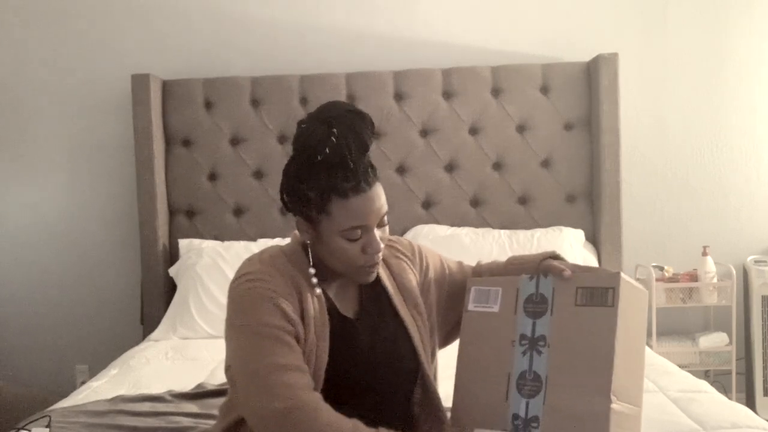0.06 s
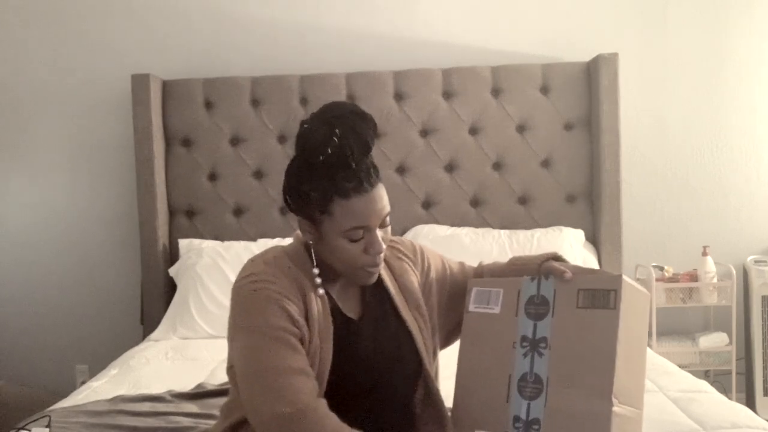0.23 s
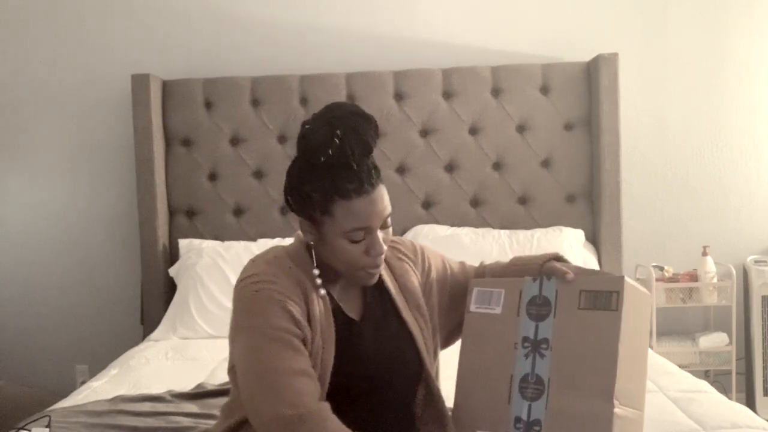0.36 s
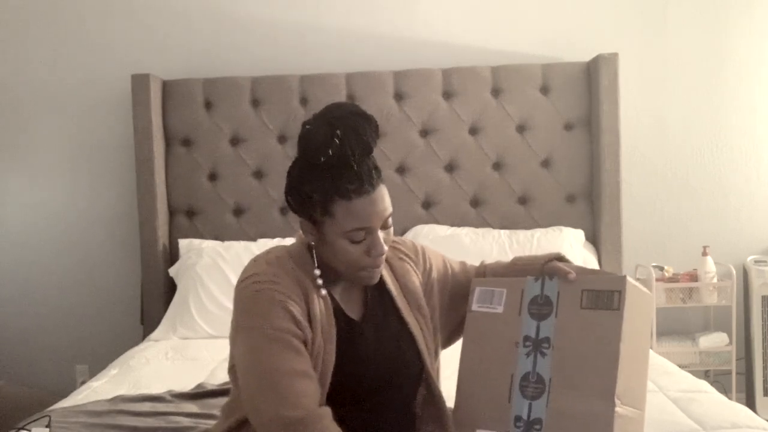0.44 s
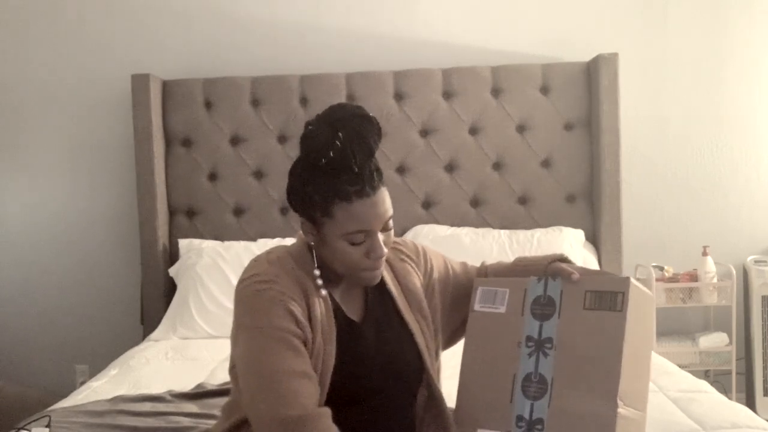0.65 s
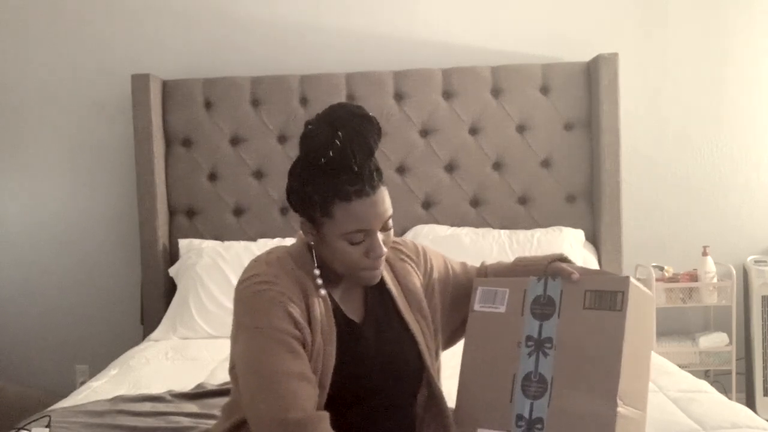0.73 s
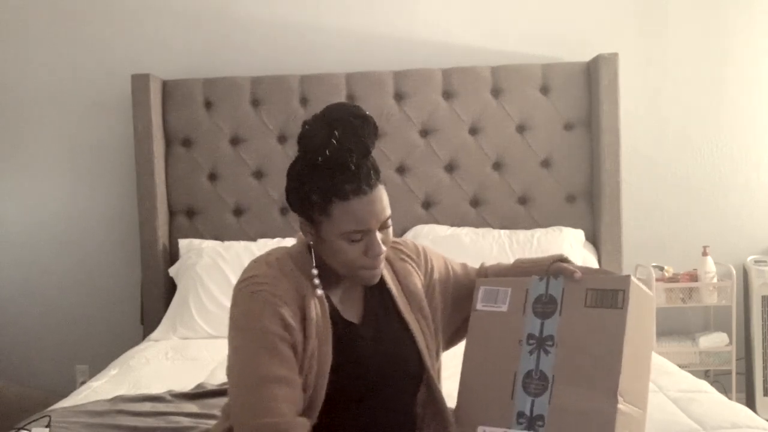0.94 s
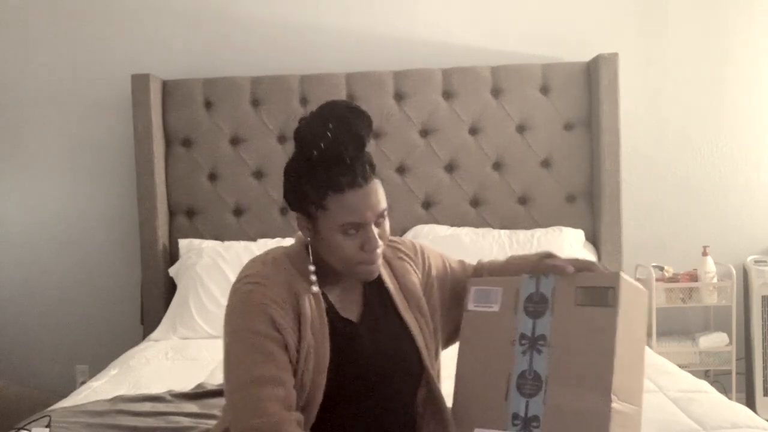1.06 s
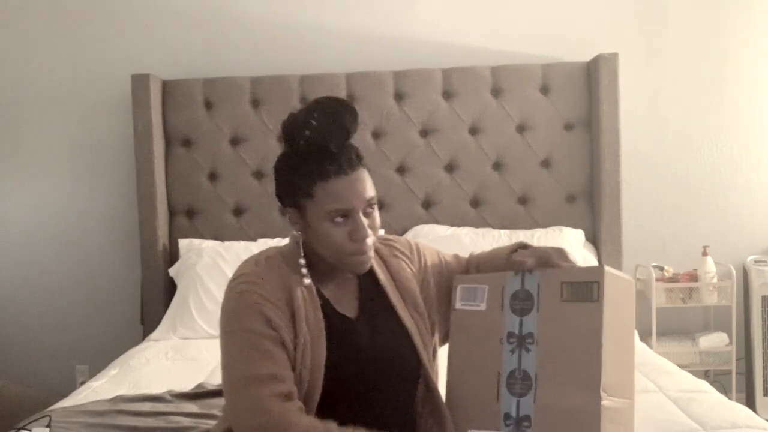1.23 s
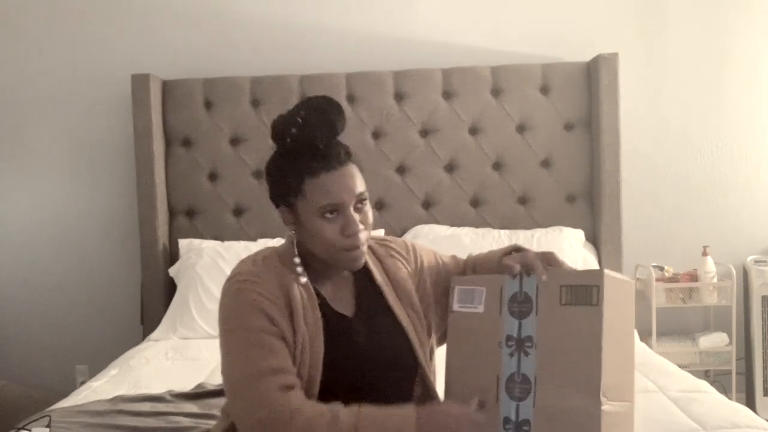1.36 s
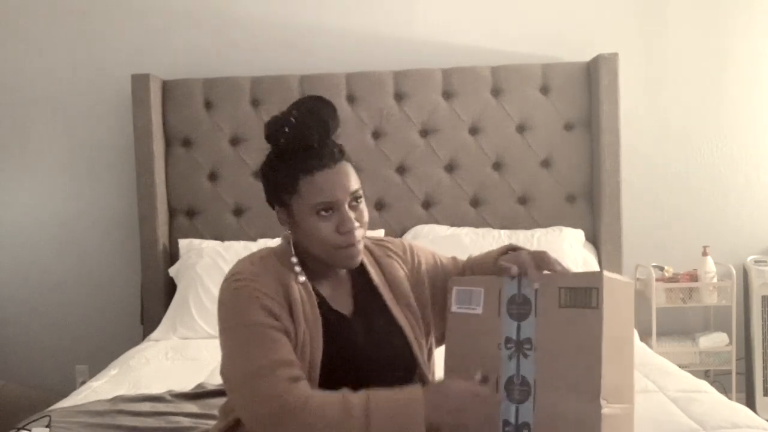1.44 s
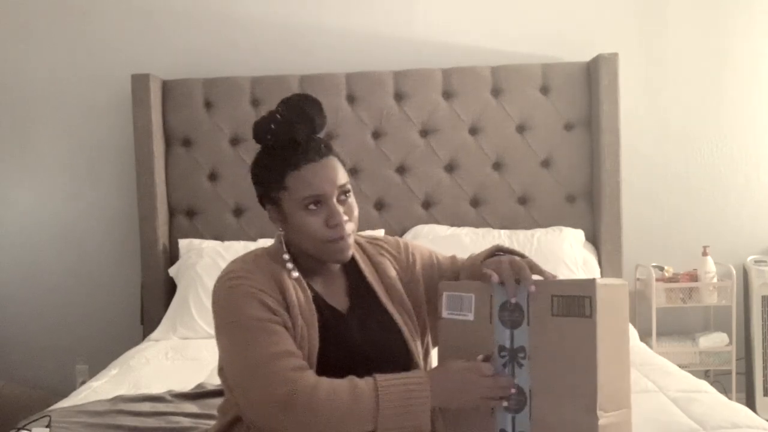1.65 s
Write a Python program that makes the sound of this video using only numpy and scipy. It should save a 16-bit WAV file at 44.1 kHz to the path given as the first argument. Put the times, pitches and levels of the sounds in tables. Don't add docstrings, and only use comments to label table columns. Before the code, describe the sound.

Close stereo sound in a soft, quiet bedroom: tape peels off a carton in three short rasps, the last two strong and crackly, fingers thump the hollow cardboard, and finally the box rustles faintly across cloth.

```python
import sys
import numpy as np
from scipy import signal
from scipy.fft import rfft, irfft, next_fast_len
from scipy.io import wavfile
from scipy.ndimage import uniform_filter1d

SR = 44100
rng = np.random.default_rng(int(sys.argv[2]) if len(sys.argv) > 2 else 0)


def magnitude_from_level(level_db):
    exponent = np.asarray(level_db, float) / 20
    return 10 ** exponent


def int16_out(signal):
    q = np.round(np.clip(np.atleast_2d(signal).T, -1, 1) * 32767)
    wavfile.write(sys.argv[1], SR, q.astype(np.int16))


N = 74970


def evened(x):
    return x / np.sqrt(np.mean(x ** 2) + 1e-20)


def read(points, hz):
    table_hz, value = np.transpose(points)
    return np.interp(np.log(hz + 1), np.log(table_hz + 1), value)


def track(rows, index):
    rows = np.array(rows)
    db = rows[:, 1]
    if index > 1:
        db = db + rows[:, index]
    return magnitude_from_level(np.interp(np.arange(N) / SR, rows[:, 0], db, -120, -120))


def summed_track(tables, index):
    return sum(track(rows, index) for rows in tables)


def colour(points):
    hz = abs(np.fft.fftfreq(4096, 1 / SR))
    log_gain = np.log(magnitude_from_level(np.maximum(read(points, hz), -90)))
    taps = np.fft.ifft(np.exp(np.conj(signal.hilbert(log_gain)))).real[:2048]
    return taps / np.linalg.norm(taps)


def ringing(modes):
    t = np.arange(SR // 4) / SR
    taps = np.zeros(len(t))
    for k, (hz, db, t60) in enumerate(modes):
        decay = magnitude_from_level(db - 60 * t / max(t60, 0.005))
        taps += (-1) ** k * decay * np.sin(2 * np.pi * hz * t) / np.sqrt(abs(t60))
    return taps / np.linalg.norm(taps)


def through(x, taps):
    return signal.oaconvolve(x, taps[None], axes=1)[:, :N]


def slips(per_s, spread_db, clump_db):
    clump_s, smear = 0.002, 0.8
    wander = uniform_filter1d(rng.standard_normal(N), max(int(clump_s * SR), 2))
    clumps = magnitude_from_level(clump_db * evened(wander))
    size = magnitude_from_level(spread_db * np.minimum(rng.exponential(1, (2, N)), 3))
    size = size * (rng.random((2, N)) < per_s / SR)
    clicks = evened(size * rng.choice([-1., 1.], (2, N)))
    return evened(clumps * (clicks + smear * rng.standard_normal((2, N))))


def patchy(x, depth_db):
    z = signal.stft(x, nperseg=256)[2]
    spots = uniform_filter1d(rng.standard_normal(z.shape[1:]), size=5, axis=0)
    spots = evened(uniform_filter1d(spots, size=4, axis=1))
    z = z * magnitude_from_level(depth_db * spots) / np.sqrt(np.mean(magnitude_from_level(2 * depth_db * spots)))
    return signal.istft(z, nperseg=256)[1][:, :N]


# pitch_hz, level_db
ROOM_TONE = [(15, -32), (25, -1), (100, 4), (298, -6), (1010, -26), (3210, -24.5), (7160, -30), (8580, -73),
             (10500, -27.5), (13800, -31), (15600, -44.5), (22000, -120)]


def air():
    return magnitude_from_level(-52) * through(rng.standard_normal((2, N)), colour(ROOM_TONE))


# start_s, drag_db, weight_on_bed_db (over the drag)
SLIDES = [
    [(0.98, -83.5, -5), (1.054, -67, 6), (1.13, -52.5, -1.5), (1.288, -45.5, 9), (1.384, -49, -2),
     (1.414, -57, -4), (1.46, -57.5, -21)],
    [(1.46, -54, -7), (1.58, -53, 13), (1.592, -46, 14), (1.61, -49.5, 13), (1.642, -46, 3.5),
     (1.694, -48, 19), (1.7, -35.5, 10)],
]
# pitch_hz, level_db
CLOTH_COLOUR = [(250, -41), (500, -2), (1500, 0), (2300, -6.5), (7000, -2.5), (10300, -2.5), (12200, -17.5),
                (15500, -29.5)]
# pitch_hz, level_db, t60_s
BOX_MODES = [(69, -15, 0.15), (141.4, -4.5, 0.14), (206.7, -1.5, 0.094), (254.3, -2.5, 0.14),
             (338, -4.5, 0.035), (422, -4, 0.059), (567, 0, 0.064), (602.7, -6, 0.055), (696.4, -4.5, .07),
             (733, -2.5, 0.049), (830, -3, 0.015), (987, -12.5, 0.016)]


def slide():
    force = slips(per_s=17000, spread_db=-8.5, clump_db=1.8)
    drag, weight = summed_track(SLIDES, 1), summed_track(SLIDES, 2)
    rustle = through(force * drag, colour(CLOTH_COLOUR))
    rumble = through(force * weight, ringing(BOX_MODES[:5]))
    return magnitude_from_level(3.5) * rustle + magnitude_from_level(-13.5) * rumble


# start_s, peak_db, ring_share (of the modes' t60), pitch_hz (favoured)
FINGER_KNOCKS = [(.05, -43, 0.78, 450), (.06, -38.5, 0.99, 148), (0.114, -35.5, 0.52, 179),
                 (.128, -42, 0.27, 490), (.14, -34.5, 2.5, 69), (0.251, -35, 0.55, 69),
                 (.406, -28, 0.42, 460), (.43, -24.5, 1.66, 69), (.51, -24, 0.35, 400),
                 (.703, -24, 0.74, 350), (.728, -20.5, 1.5, 300), (.759, -17.5, 0.9, 704),
                 (.885, -41, 1, 69), (1.614, -34.5, 0.89, 69), (0.151, -25.5, 0.89, 398),
                 (0.181, -26, 0.72, 603), (0.218, -22, 1.1, 150), (0.404, -17.5, 0.54, 180),
                 (0.456, -16, 1, 205), (0.538, -22, 1.5, 254), (.656, -23, 0.56, 303),
                 (0.678, -31, 0.43, 145), (.818, -18.5, 0.81, 183.5), (0.899, -33, .6, 136),
                 (1.583, -38, 0.29, 620), (1.5897, -33, 0.91, 447), (1.592, -26, 0.71, 145),
                 (1.684, -33, 1, 141)]


def knocks():
    contact_s, level_db, db_per_octave = 0.00095, -2, -14
    out = np.zeros((2, N))
    u = np.arange(400) / (contact_s * SR)
    for start_s, db, ring, spot_hz in FINGER_KNOCKS:
        modes = [(hz, db_per_octave * abs(np.log2(hz / spot_hz)), t60 * ring)
                 for hz, _, t60 in BOX_MODES]
        body = np.convolve(u * np.exp(-u), ringing(modes))
        part = out[:, round(start_s * SR):][:, :len(body)]
        part += magnitude_from_level(db + level_db) * body[:part.shape[1]] / abs(body).max()
    return out


# start_s, peak_db, brightness_db, length_s
GLUE_SNAPS = [(0.001, -46, -9.5, 0.0067), (0.05, -41.5, -1, 0.0023), (0.116, -42, 0.5, 0.0069),
              (0.15, -40.5, 13.5, 0.0054), (0.173, -34.5, 5.5, 0.0065), (0.204, -30, 6.5, 0.004),
              (0.391, -34, 9, 0.0039), (0.422, -11.5, -1, 0.004), (0.646, -33.5, -4, .005),
              (0.657, -32, -13, .004), (0.75, -14.5, -5.5, 0.005), (0.766, -20.5, -2, 0.0089),
              (0.809, -22.5, -2, 0.011), (0.84, -22.5, 7.5, 0.0047), (1.591, -35.5, 0.5, 0.004),
              (1.624, -38.5, 1.5, 0.015), (1.659, -40.5, -7, 0.0089), (1.674, -43, -9, .012),
              (1.696, -32, -11, 0.0027)]
# pitch_hz, level_db, t60_s
FLAP_MODES = [(1286, 2, 0.023), (1408, -2.5, 0.0086), (1533, 3.5, .022), (1618, 3.5, 0.011),
              (1669, 4.5, 0.022), (1765, 1.5, 0.011), (2050, -1.5, 0.05), (2266, -9, 0.019)]
# pitch_hz, level_db
CRACK_COLOUR = [(700, -39), (1600, -11), (3500, -8.5), (6800, 2), (10500, -6), (12200, -21), (15500, -22.5)]


def snaps():
    level_db = -9
    t, dull, bright = np.arange(N) / SR, np.zeros(N), np.zeros(N)
    for start_s, db, bright_db, length_s in GLUE_SNAPS:
        u = np.maximum(t - start_s, 0) / max(length_s, 0.001)
        shape = magnitude_from_level(db + level_db) * u * np.exp(1 - u * u)
        dull += shape * magnitude_from_level(-bright_db)
        bright += shape * magnitude_from_level(bright_db)
    force = slips(per_s=6000, spread_db=2.5, clump_db=0.8)
    return through(force * dull, ringing(FLAP_MODES)) + through(force * bright, colour(CRACK_COLOUR))


# start_s, peak_db, pitch_hz (favoured), brightness_db
LARGE_SLIPS = [(0.048, -38, 1530, -3), (0.1229, -39.5, 1600, -6), (0.1475, -32, 1350, 8),
               (0.174, -31, 1424, -2), (0.209, -25, 1542, -10), (0.2118, -26, 1600, -6),
               (.3905, -23.5, 1750, -4), (0.4148, -14.5, 1593, -10), (0.426, -16, 1477, -14),
               (.428, -2, 1567, -8.5), (.4405, -18, 2070, -5.5), (.452, -15.5, 1813, -2.5),
               (.461, -18.5, 1520, -11), (.468, -14, 1740, -9.5), (.476, -16, 2057, -11),
               (0.486, -14.5, 1710, -9), (0.496, -18.5, 1590, -7), (.505, -21.5, 2143, -12.5),
               (0.514, -22.5, 1723, -7), (.6605, -28, 1655, -10), (.682, -28.5, 2020, -12),
               (0.6943, -29, 1750, -4.5), (0.712, -19.5, 1680, -10), (0.7273, -15.5, 1725, -14.5),
               (0.743, -26, 1733, -8), (0.7526, -14, 1780, -13), (0.7592, -19.5, 1466, -12),
               (.769, -19, 2092, -1), (0.7778, -17, 1334, -9), (.790, -18.5, 1810, -20.5),
               (0.798, -17.5, 1515, -12.5), (.807, -18.5, 1900, -10.5), (0.815, -11, 1687, -9),
               (0.825, -14.5, 1650, -13), (0.836, -19, 1450, -10.5), (.842, -28.5, 1450, -6),
               (1.662, -39, 1570, -8)]


def ticks():
    level_db, rise_s, t60_s = -4, 0.0011, 0.029
    out, crack = np.zeros((2, N)), colour(CRACK_COLOUR)
    swell = 1 - np.exp(-np.arange(len(crack)) / (rise_s * SR))
    for start_s, db, spot_hz, bright_db in LARGE_SLIPS:
        body = ringing([(spot_hz, 0, t60_s)])[:len(crack)] * swell
        body = body / abs(body).max() + magnitude_from_level(bright_db) * crack / abs(crack).max()
        part = out[:, round(start_s * SR):][:, :len(body)]
        part += magnitude_from_level(db + level_db) * body[:part.shape[1]]
    return out


# start_s, pull_db, grip_on_box_wall_db, tape_fizz_db (last two over the pull)
TAPE_PULLS = [
    [(0.0, -40, 3, -8), (0.02, -65.5, 12, 11.5), (0.056, -50, 1.5, -11), (0.09, -61, 3.5, -7.5),
     (0.16, -49, 16.5, 3), (0.202, -56.5, 17, 9.5), (0.212, -30.5, 12, -4.5), (0.23, -63.5, 16, 12.5),
     (0.36, -80.5, 2.5, 13)],
    [(0.37, -107, 1, 32), (0.39, -28, 11, -16), (0.404, -31.5, 10.5, -2), (0.432, -15, -4, -8.5),
     (0.444, -22.5, 2, -7), (0.496, -21, -1.5, -11), (0.548, -49, 12, 5), (0.64, -49.5, -6, -18.5)],
    [(0.64, -59.5, 0, 6), (0.66, -34.5, 7, -12.5), (0.68, -41, 5, 1), (0.734, -21.5, 0, -14),
     (0.83, -23, -5.5, -10.5), (0.842, -38, 12.5, 7.5), (0.892, -57, 11, 6.5), (0.956, -62, -10, 2),
     (1.0, -79.5, 6, -2.5)],
]
# pitch_hz, level_db
FIZZ_COLOUR = [(500, -38), (1000, -5.5), (1700, -6.5), (2500, -10.5), (6500, -10), (8300, -12.5),
               (10500, -11), (12200, -25), (15500, -33)]


def tape():
    force = slips(per_s=1700, spread_db=3, clump_db=2)
    own = 0.8
    fine = (1 - own) * force + own * slips(per_s=2500, spread_db=1, clump_db=0.5)
    pull, grip, fizz = (summed_track(TAPE_PULLS, k) for k in (1, 2, 3))
    flap = through(force * pull, ringing(FLAP_MODES))
    box = through(force * grip, ringing(BOX_MODES))
    film = patchy(through(fine * fizz, colour(FIZZ_COLOUR)), depth_db=3.5)
    return magnitude_from_level(-5.5) * flap + magnitude_from_level(-1) * box + magnitude_from_level(6) * film


def bedroom(x):
    t60_s, echo_chance, gap_s = 0.22, 0.05, 0.004
    t = np.arange(SR // 3) / SR
    signs = rng.choice([-1., 1.], (2, len(t)))
    sparse = rng.random((2, len(t))) < echo_chance
    taps = signs * sparse * (t > gap_s) * magnitude_from_level(-60 * t / t60_s)
    return signal.fftconvolve(x, taps / np.linalg.norm(taps[0]), axes=1)[:, :N]


# pitch_hz, left_lead_radians
PORT_TURN = [(0, 0.5), (300, 1.23), (950, -3), (1210, -1.14), (1810, -1.2), (3190, -1.5), (6200, -4.5),
             (9000, -2.5), (11400, -2)]
# pitch_hz, left_over_right_db
PORT_TILT = [(60, .5), (160, .6), (380, 8), (950, 2.5), (2370, 7), (5960, 1.5), (10000, 0)]
# pitch_hz, likeness (0 to 1)
PORT_LIKENESS = [(60, 0.9), (150, 0.9), (300, 0.7), (600, 0.46), (1500, 1), (3000, 0.29), (6000, 0.35),
                 (9000, 1), (13000, 0.36)]


def ports(x):
    size = next_fast_len(N + 4096)
    hz, (first, second) = np.fft.rfftfreq(size, 1 / SR), rfft(x, size)
    same = np.clip(read(PORT_LIKENESS, hz), 0, 1)
    turn = np.exp(-1j * np.interp(hz, *np.transpose(PORT_TURN)))
    right = (same * first + np.sqrt(1 - same ** 2) * second) * turn
    half = magnitude_from_level(read(PORT_TILT, hz) / 2)
    return irfft(np.array([first * half, right / half]), size)[:, :N]


def scene():
    near = tape() + snaps() + ticks() + knocks() + slide()
    return ports(near + magnitude_from_level(-9) * bedroom(near) + air())


# pitch_hz, threshold_db (over the middle treble)
MID_THRESHOLD = [(7500, -24.5), (8200, -6), (9000, -0.5), (9900, -7.5), (11300, -9), (12200, -3.5),
                 (13300, -19), (14200, -22), (15500, -19.5)]
# pitch_hz, threshold_db (over the middle treble)
SIDE_THRESHOLD = [(10800, -38.5), (11600, 21), (12500, -6), (15500, -7)]


def thinned(x):
    waver_db, onset_share, level_share, ref_db = 3, 1.3, 0.72, -58
    mid_side = np.array([x[0] + x[1], x[0] - x[1]]) / 2
    hz, _, z = signal.stft(mid_side, SR, nperseg=2048, noverlap=1024)
    power = (abs(z[:, :1024]) ** 2).reshape(2, 64, 16, -1).mean(2)
    centre = hz[8:1024:16]
    frame_db = 10 * np.log10(power[:, 8:20].mean((0, 1)) + 1e-14)
    rise_db = np.maximum(np.diff(frame_db, prepend=frame_db[0]), 0)
    onset_db = onset_share * rise_db * np.array([1, 0.6])[:, None, None]
    base_db = ref_db + level_share * (frame_db - ref_db) - onset_db
    waver = evened(uniform_filter1d(rng.standard_normal(power.shape), size=3, axis=2))
    need_db = np.array([read(MID_THRESHOLD, centre), read(SIDE_THRESHOLD, centre)])[:, :, None]
    need_db = need_db + waver_db * waver + base_db
    keep = (power > magnitude_from_level(need_db) ** 2) | (centre < 7400)[:, None]
    keep = keep & (centre < 15600)[:, None]
    z[:, :1024] *= np.repeat(keep, 16, axis=1)
    mid, side = signal.istft(z, SR, nperseg=2048, noverlap=1024)[1][:, :N]
    return np.array([mid + side, mid - side])


def low_pass(x):
    return signal.sosfilt(signal.butter(12, 15540, fs=SR, output="sos"), x)


def record(dry):
    low_cut = signal.butter(4, 42, "high", fs=SR, output="sos")
    x = signal.sosfilt(low_cut, dry)
    limit = 1.3
    mix = thinned(limit * np.tanh(x / limit))
    return low_pass(mix)


dry = scene()
out = record(dry)
int16_out(out)
```